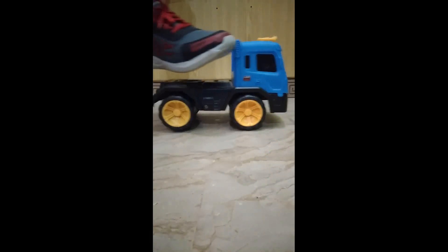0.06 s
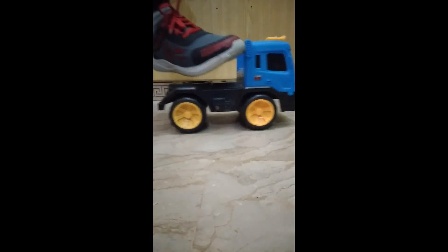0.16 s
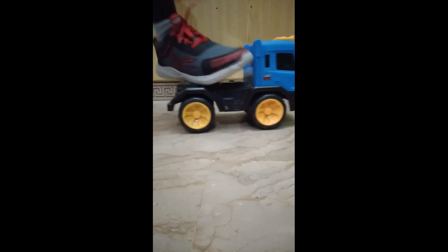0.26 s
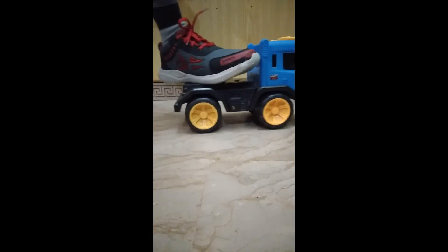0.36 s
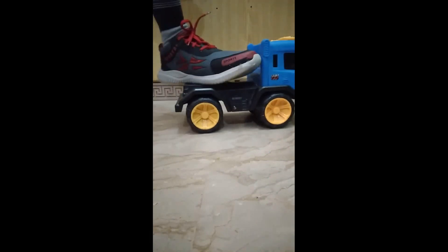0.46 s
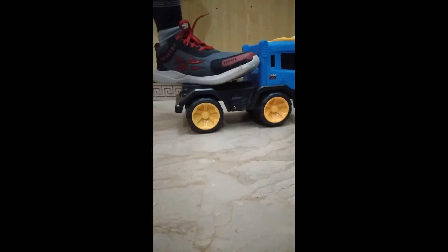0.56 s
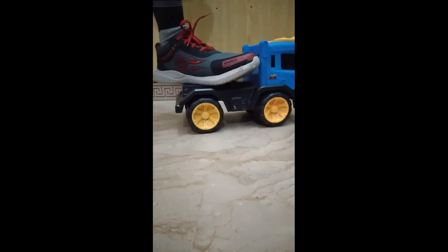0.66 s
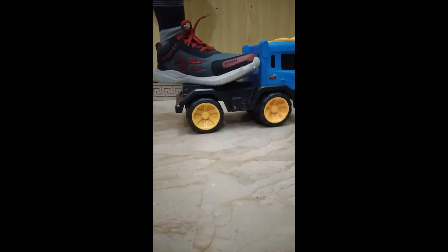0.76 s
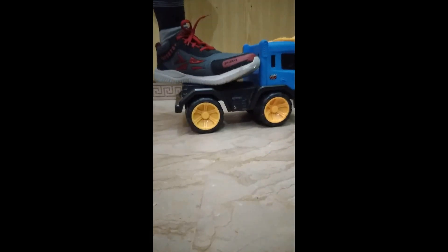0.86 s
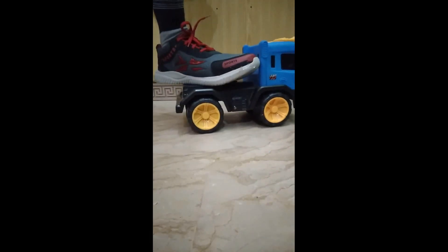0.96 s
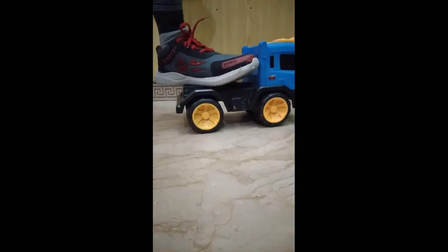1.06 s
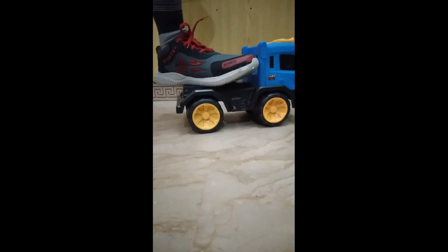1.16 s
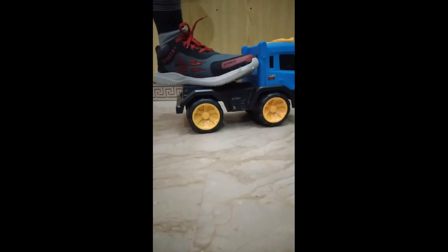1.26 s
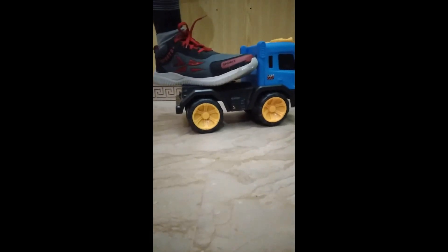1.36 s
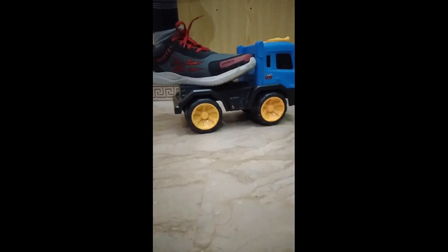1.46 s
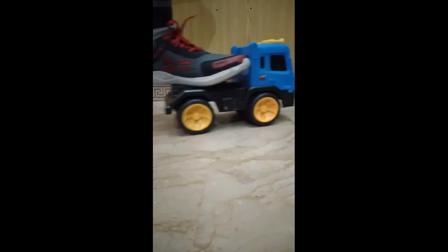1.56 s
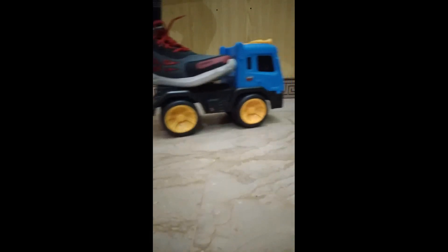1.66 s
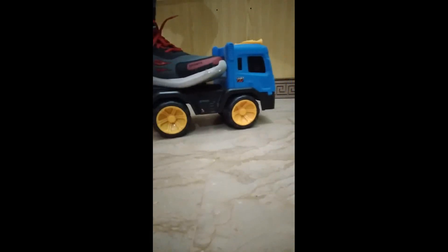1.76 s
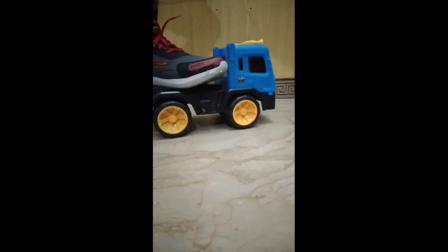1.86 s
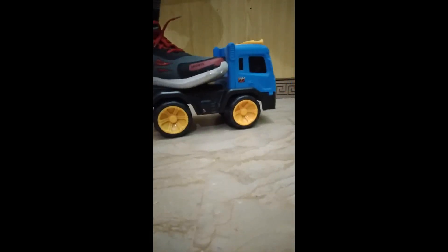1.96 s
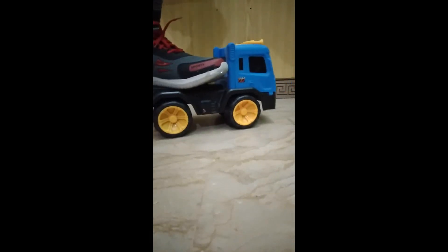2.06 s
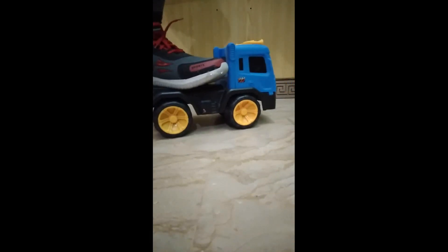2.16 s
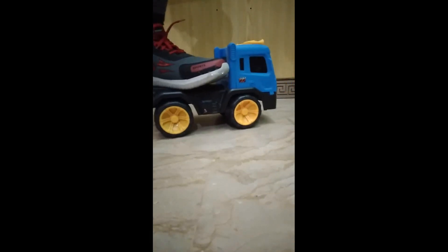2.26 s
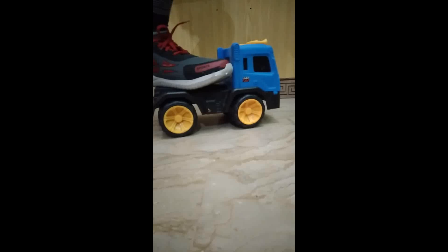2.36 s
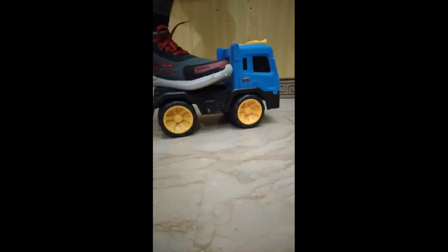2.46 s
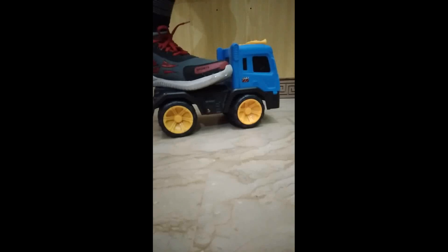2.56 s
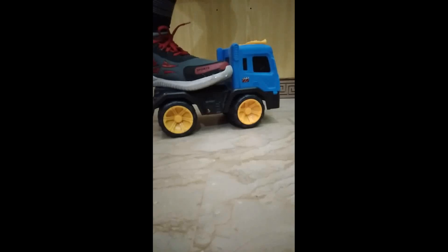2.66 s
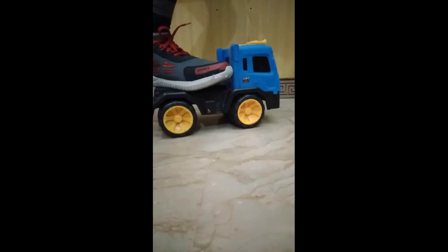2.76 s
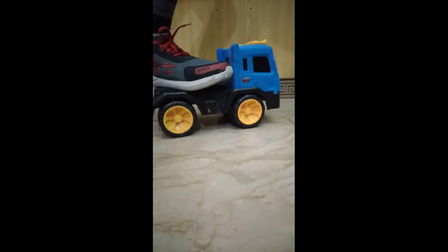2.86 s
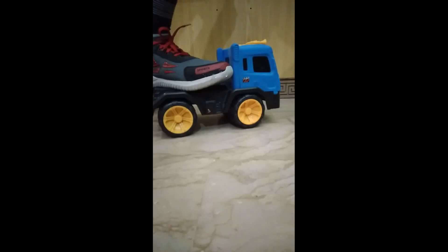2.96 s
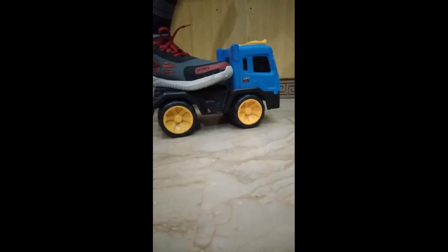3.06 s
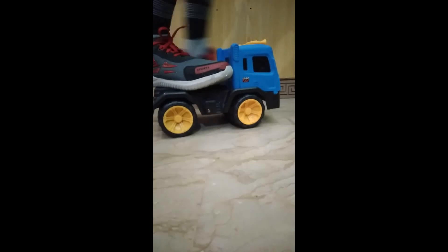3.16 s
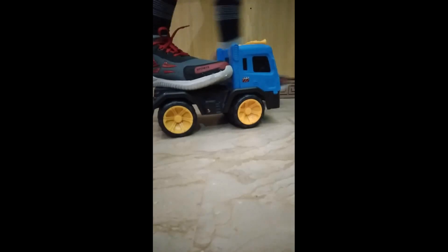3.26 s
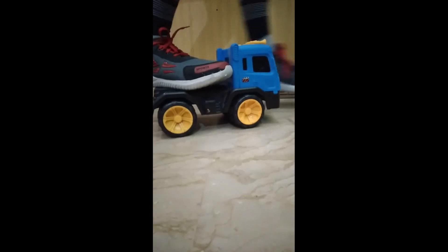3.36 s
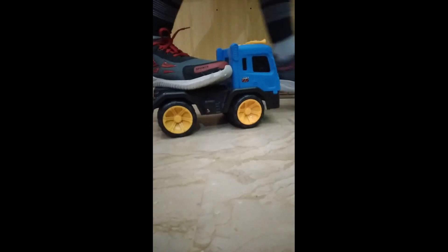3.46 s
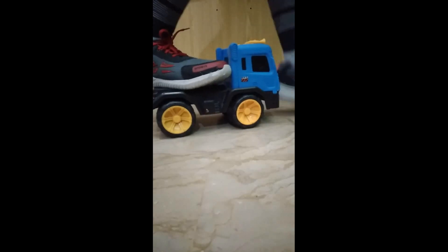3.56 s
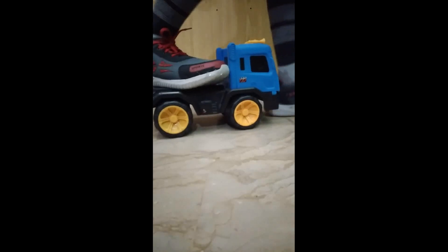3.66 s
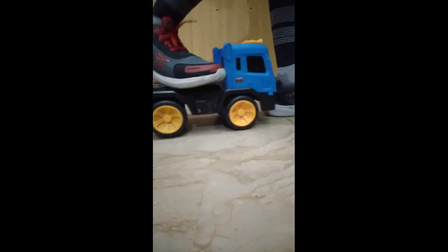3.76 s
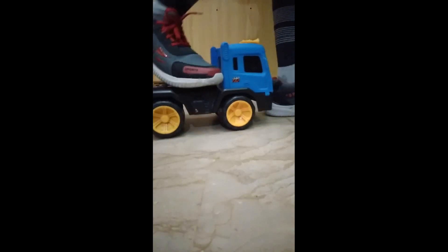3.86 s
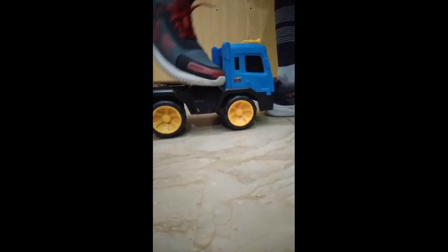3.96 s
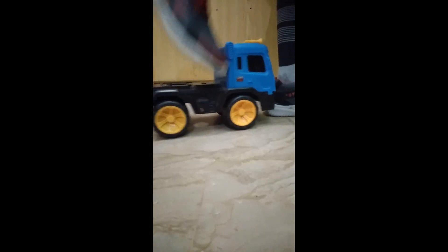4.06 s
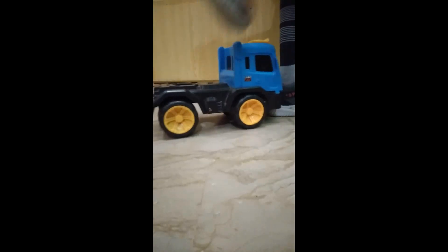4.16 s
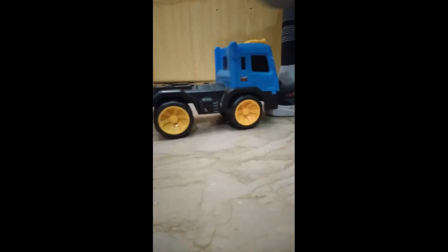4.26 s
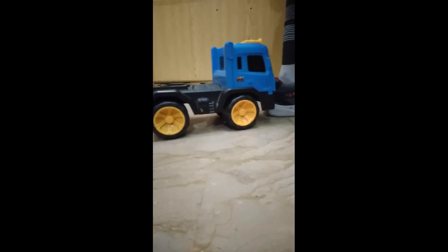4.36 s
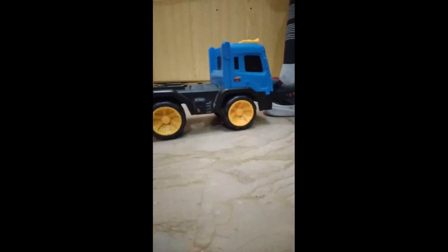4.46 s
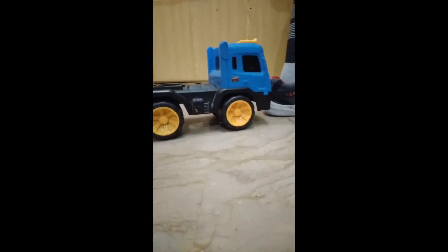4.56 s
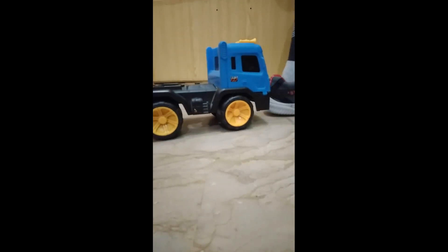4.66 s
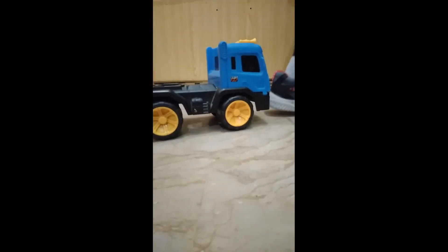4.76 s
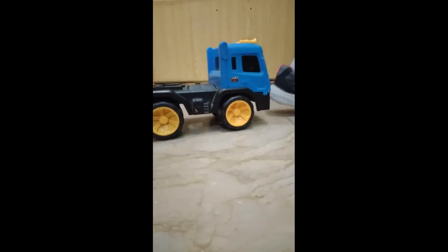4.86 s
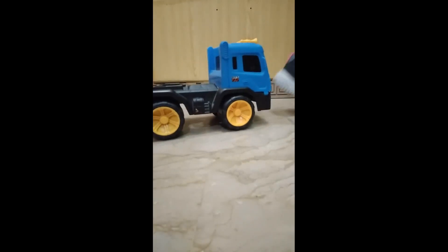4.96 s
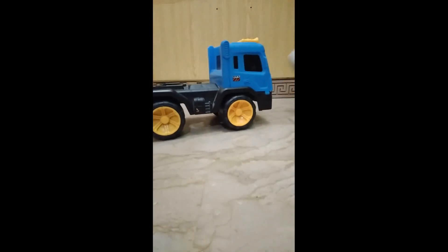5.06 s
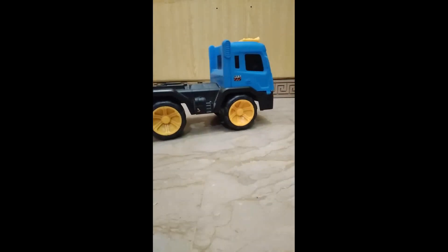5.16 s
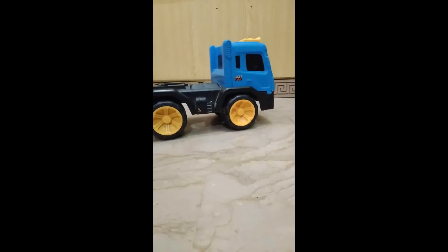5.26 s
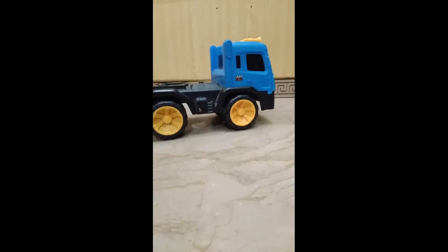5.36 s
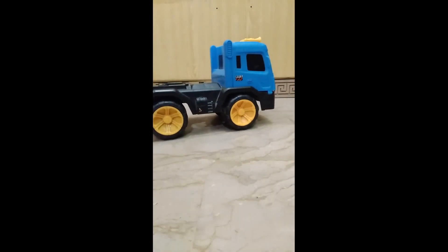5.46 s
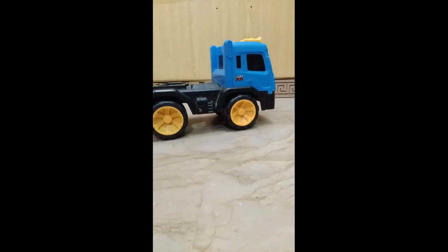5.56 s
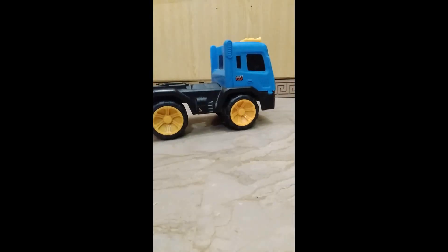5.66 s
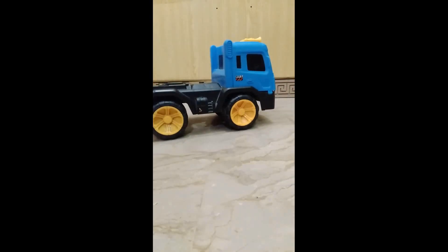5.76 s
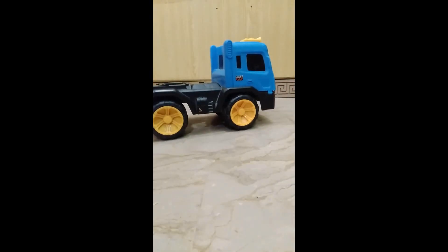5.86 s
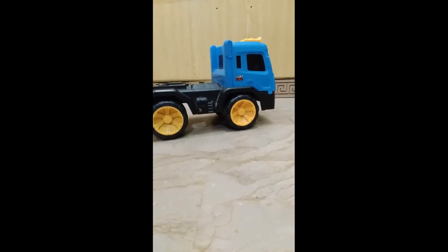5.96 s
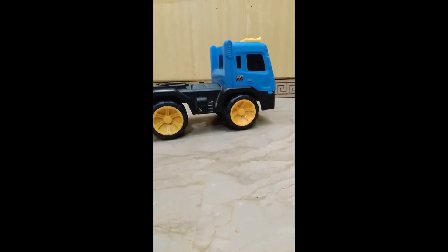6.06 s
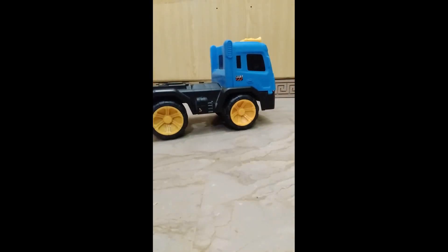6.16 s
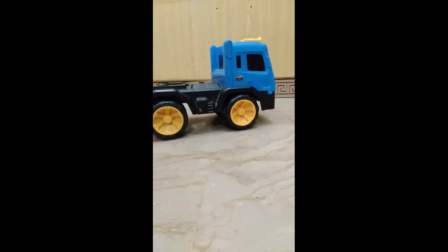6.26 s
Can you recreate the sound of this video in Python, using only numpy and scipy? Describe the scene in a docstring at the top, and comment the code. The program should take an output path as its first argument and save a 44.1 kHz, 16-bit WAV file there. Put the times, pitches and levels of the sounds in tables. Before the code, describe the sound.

A shoe lands on a hollow plastic toy truck with a loud, quick cluster of knocks and rattles. Gritty rolling fades into near quiet, then smaller knocks, ticks and dull thuds return. A second clatter comes as the foot lifts off, followed by a faint sandy scuff and quiet. Close stereo microphone in a small, hard-floored room.

```python
"""Sharp hollow knocks open the scene: a shoe steps on a plastic toy truck and shoves it to and fro on stone.
The shell is a bank of decaying modes, struck by blows and kept rattling by random bumps.
Filtered grains and noise make the grit under the wheels; short noise bursts make ticks and dull thuds.
The foot lifts off with a last clatter and a sole scuffs away as sandy noise, over a faint rumble.
Truck, grit and sole sound in a small room, picked up by two ports."""
import sys
import numpy as np
from scipy import signal
from scipy.fft import rfft, irfft, next_fast_len
from scipy.io import wavfile
from scipy.ndimage import map_coordinates

SR = 44100
rng = np.random.default_rng(int(sys.argv[2]) if len(sys.argv) > 2 else 0)


def digitize_waveform(pressure):
    """Quantize a signal to 16-bit integers and store it at the path in sys.argv[1].

    Rows of a 2-D input are taken as channels; values are limited to [-1, 1].
    """
    field = np.atleast_2d(pressure).T
    bounded = np.clip(field, -1, 1)
    quanta = np.round(bounded * 32767).astype(np.int16)
    wavfile.write(sys.argv[1], SR, quanta)


N = 278712

# Blows on the shell. Each row: start in seconds, relative level in dB,
# hardness in dB (panels over hollow body).
BLOWS = [(0.149, -19, -6), (0.158, -12, -1.5), (0.189, -19, 0.5), (0.245, -12, 9.5), (0.257, -17.5, 0),
         (0.264, -14, 7), (0.281, -26, 0.5), (0.366, -21.5, 4), (0.385, -22.5, -1), (0.396, -18, -4.5),
         (0.406, -18, -12), (0.418, -22, -1.5), (0.425, -18, 0), (0.436, -24, 0), (0.941, -56.5, -19),
         (1.485, -37.5, -26), (1.603, -21, -11), (1.714, -28.5, -1), (1.726, -24.5, -1), (1.782, -32.5, -5),
         (1.815, -31.5, -2), (1.908, -41, 6), (2.155, -50.5, -1.5), (2.451, -28.5, -5), (2.647, -32, 31),
         (2.934, -34, 11), (3.206, -44.5, -11), (3.471, -26.5, -9.5), (3.535, -35.5, 6.5), (3.591, -43, 9),
         (3.642, -21.5, -10.5), (3.675, -15.5, -5), (3.751, -32.5, 0), (3.835, -32.5, -7),
         (3.969, -32.5, 10), (4.004, -32.5, -2.5), (4.037, -34, 4), (4.141, -25.5, -3), (4.177, -30, 9.5),
         (4.189, -26.5, 5), (4.258, -23, 9.5), (4.264, -18.5, 9.5), (4.277, -18, -4), (4.839, -50, -9)]
# Modes of the hollow truck. Each row: frequency in Hz, relative level in dB,
# t60 in seconds without the sole's damping.
SHELL_MODES = [(365, -12, 0.032), (439, -1.5, 0.047), (581.4, 2.5, 0.052), (614.4, 4.5, 0.031),
               (783, 0.5, 0.016), (897, -1.5, 0.014), (1064.4, -5.5, 0.048), (1162, 1, 0.023),
               (1292, 3, 0.014), (1442, -10.5, 0.063), (1640, -23, 0.17), (1846, -8.5, 0.013),
               (2235, -20, 0.028), (2420, -17, 0.016), (2835, -17, 0.012), (3400, -20.5, 0.007),
               (3960, -15, 0.0033)]
BODY_TOP_HZ, PANEL_TOP_HZ = 820, 1760  # body modes below, then panels, then stiff edges
# Spectrum of the floor rumble. Each row: frequency in Hz, relative level in dB per Hz.
RUMBLE_SPECTRUM = [(8, 3.5), (25, -1), (45, -4.5), (65, -10.5), (100, -16.5), (200, -38.5), (500, -93)]
PUSH_RISE_S, PUSH_FALL_S = 0.08, 0.126  # time of a push to rise and fall by 60 dB


def amp(db):
    """Decibels to amplitude factor."""
    return 10 ** (np.asarray(db) / 20)


def unit(x):
    """Scale to unit RMS."""
    return x / np.sqrt(np.mean(x ** 2) + 1e-20)


def peaked(x):
    """Scale to unit peak."""
    return x / np.abs(x).max()


def along(points, hz):
    """Interpolate (Hz, value) points on a log-frequency axis."""
    f, v = np.transpose(points)
    return np.interp(np.log(hz + 1), np.log(f + 1), v)


def fade(t, t60):
    """Exponential decay by 60 dB in t60 seconds, 1 ms at least."""
    return np.exp(-np.log(1000) * t / np.maximum(t60, 1e-3))


def onset(t, attack_s):
    """Exponential rise with time constant attack_s."""
    return 1 - np.exp(-t / attack_s)


def filtered(x, response):
    """Multiply the spectrum of x by a complex response of frequency."""
    n = x.shape[-1]
    m = next_fast_len(n + 8192)
    return irfft(rfft(x, m) * response(np.fft.rfftfreq(m, 1 / SR)), m)[..., :n]


def coloured(x, spectrum):
    """Shape x by (Hz, dB) points and scale to unit RMS."""
    return unit(filtered(x, lambda hz: amp(along(spectrum, hz))))


def hump(hz, centre_hz, octaves):
    """Bell on the log-frequency axis."""
    return np.exp(-.5 * (np.log2((hz + 1) / centre_hz) / octaves) ** 2)


def add(track, s, sound):
    """Mix sound into track at s seconds, cut at the track's end."""
    start = max(round(s * SR), 0)
    part = track[..., start:start + sound.shape[-1]]
    part += sound[..., :part.shape[-1]]


def grains(rate, spread_db):
    """Random tiny impacts, rate per second, levels scattered by spread_db."""
    hits = rng.random(N) < rate / SR
    signs = rng.choice([-1, 1], N)
    sizes = amp(spread_db * np.clip(rng.standard_normal(N), -2, 2))
    return unit(hits * signs * sizes)


def wobble(rate):
    """Smooth random curve, rate knots per second."""
    knots = rng.standard_normal(int(N * rate / SR) + 4)
    return map_coordinates(knots, [np.arange(N) * rate / SR])


def resonate(x, modes):
    """Ring (Hz, dB, t60) modes with x through a unit-energy impulse response."""
    t = np.arange(SR // 8) / SR
    ring = np.zeros(len(t))
    for k, (hz, db, t60) in enumerate(modes):
        ring += (-1) ** k * amp(db) * np.sin(2 * np.pi * hz * t) * fade(t, t60)
    return signal.fftconvolve(x, ring / np.linalg.norm(ring))[:N]


def swell(start, end, rise_s, fall_s, gained_db=0):
    """Gain per sample: rise, hold sloping by gained_db from start to end, fall."""
    t = np.arange(N) / SR
    hold = amp(np.interp(t, [start, end], [-gained_db / 2, gained_db / 2]))
    return hold * fade(np.maximum(start - t, 0), rise_s) * fade(np.maximum(t - end, 0), fall_s)


def background(flutter_db=-51, air_db=-63.5):
    """Faint steady noise and a low flutter, independent at the two ports."""
    # Steady noise. Each row: frequency in Hz, relative level in dB per Hz.
    air_spectrum = [(53, -29.5), (90, -7.5), (188, -8), (271, -10), (337, -14), (658, -22), (717, -26),
                    (930, -26.5), (1670, -43.5), (4130, -47.5), (9200, -51), (10300, -49.5), (15800, -63.5)]
    low, air = rng.standard_normal((2, 2, N))
    return amp(flutter_db) * coloured(low, RUMBLE_SPECTRUM) + amp(air_db) * coloured(air, air_spectrum)


def rumble(gain_db=-3.5, side_db=-20, rise_s=0.6, fall_s=1):
    """The floor rumbles under moving weight: low noise nearly alike at both ports."""
    # Weight shifts. Each row: start in seconds, end in seconds, relative level in dB.
    weight_shifts = [(1.6, 1.904, -56), (2.571, 3.73, -44), (4.08, 4.45, -51)]
    load = sum(amp(db) * swell(start, end, rise_s, fall_s) for start, end, db in weight_shifts)
    mid, side = coloured(rng.standard_normal((2, N)), RUMBLE_SPECTRUM)
    return amp(gain_db) * load * (mid + amp(side_db) * np.array([side, -side]))


def booms(attack_s=0.014):
    """Deep bumps: decaying low sines that swing for a few cycles."""
    # Each row: start in seconds, peak in dB, frequency in Hz, t60 in seconds.
    deep_bumps = [(2.535, -36.5, 52, 0.37), (3.219, -37.5, 76, 0.26), (3.348, -32, 44.5, 0.23)]
    out, t = np.zeros(N), np.arange(SR // 2) / SR
    for s, db, hz, t60 in deep_bumps:
        swing = np.sin(2 * np.pi * hz * t) * fade(t, t60) * onset(t, attack_s)
        add(out, s, amp(db) * peaked(swing))
    return out


def scuffs(gain_db=-5, sand_db=-4, judder_db=3.5):
    """Rubber drags over dusty stone: hiss with sandy grains, its level juddering."""
    # Each row: start in seconds, end in seconds, relative level in dB, dB gained from start to end.
    drags = [(4.764, 4.795, -62.5, 8.5), (4.875, 5.129, -54.5, -1.5), (5.142, 5.274, -52.5, -7.5)]
    # Each row: frequency in Hz, relative level in dB per Hz.
    scuff_spectrum = [(240, -33), (400, -5.5), (850, -4.5), (1190, 2), (1810, -12.5), (2950, -8.5),
                      (5060, -3.5), (7320, -7), (7910, -10.5), (10400, -10.5), (13300, -17), (15800, -25)]
    drag = np.zeros(N)
    for start, end, db, gained_db in drags:
        drag += amp(db) * swell(start, end, PUSH_RISE_S, PUSH_FALL_S, gained_db)
    dust = rng.standard_normal(N) + amp(sand_db) * grains(rate=560, spread_db=9)
    dust *= amp(judder_db * wobble(50))
    return amp(gain_db) * drag * coloured(dust, scuff_spectrum)


def agitation():
    """Drive of body, panels and grit: powers of the pushes and of the rattle after each blow."""
    # Pushes that roll the wheels or drag the sole. Each row: start in seconds, end in seconds,
    # relative level of the shell in dB, panels over body in dB, relative level of the grit in dB,
    # dB gained from start to end.
    pushes = [(0.191, 0.327, -44.5, -0.5, -64, -9.5), (0.369, 0.488, -42.5, -4, -58.5, -4.5),
              (0.554, 0.664, -45.5, -1.5, -48, -1), (1.387, 1.501, -60.5, 1, -65.5, 9.5),
              (1.597, 1.709, -52.5, 0, -64, -4.5), (1.712, 1.917, -53.5, -3.5, -60, -15),
              (2.129, 2.43, -72.5, -6, -86, 6.5), (2.419, 2.53, -61, 2.5, -58, 2),
              (2.505, 2.772, -74, -10, -61.5, -4), (2.79, 2.943, -66, -2, -54.5, -7),
              (3.217, 3.235, -68, 2.5, -70, 7), (3.512, 3.533, -84, 0.5, -59.5, -2.5),
              (3.665, 3.779, -47.5, -0.5, -52, -15.5), (3.824, 3.934, -55.5, 2.5, -53.5, -13),
              (3.953, 4.119, -56, -4.5, -61, 7), (4.128, 4.305, -49, -3, -55, -9),
              (4.643, 4.689, -82, 3.5, -79.5, -4.5), (6.212, 6.29, -68, -5.5, -90, -2)]
    # loose parts chatter after a blow and shake the dust
    rattle_db, rattle_t60_s, rattle_rise_s, rattle_grit_db = -20, 0.083, 0.008, -11.5
    power, t = np.zeros((3, N)), np.arange(SR // 2) / SR
    for start, end, shell_db, panel_db, grit_db, gained_db in pushes:
        push = swell(start, end, PUSH_RISE_S, PUSH_FALL_S, gained_db)
        power += np.outer(amp([shell_db, shell_db + panel_db, grit_db]), push) ** 2
    for s, db, hard_db in BLOWS:
        rattle = amp(db + rattle_db) * fade(t, rattle_t60_s) * onset(t, rattle_rise_s)
        shares = amp([0, hard_db / 2, rattle_grit_db + hard_db / 2])
        add(power, s, np.outer(shares, rattle) ** 2)
    return np.sqrt(power)


def grinding(pressure, gain_db=-5, hiss_db=-5, hub_db=-13, judder_db=1.5):
    """Dust is ground in uneven slips: sharp grains on a fine hiss, which also ring the hubs."""
    # Each row: frequency in Hz, relative level in dB per Hz.
    grit_spectrum = [(400, -20), (900, -13.5), (1500, -11), (2000, -14.5), (2600, -5.5), (3600, -15.5),
                     (4900, -9), (6600, -12.5), (8200, -15.5), (10500, -17.5), (13200, -26), (15800, -25.5)]
    # Wheel hubs. Each row: frequency in Hz, relative level in dB, t60 in seconds.
    hub_modes = [(1616, 3.5, 0.031), (2760, -3.5, 0.011), (5800, -4.5, .008), (6600, -5, 0.029)]
    dust = grains(rate=900, spread_db=5.5) + amp(hiss_db) * rng.standard_normal(N)
    dust *= amp(judder_db * wobble(60))
    grit = coloured(dust, grit_spectrum)
    hubs = amp(hub_db) * unit(resonate(dust, hub_modes))
    return amp(gain_db) * pressure * (grit + hubs)


def ticks(pressure, t60_s=0.0053, attack_s=0.00028, octaves=0.575, gain_db=-3):
    """Joints slip and grit cracks in short noise bursts; lesser ones fall at random, scaled by pressure."""
    # Low for joints, high for crushed grit.
    # Each row: start in seconds, relative level in dB, centre frequency in Hz.
    cracks = [(0.2443, -30.5, 2868), (0.2702, -28.5, 6035), (0.3681, -33, 2697), (0.4781, -40, 6770),
              (0.5193, -38, 8110), (0.5382, -42.5, 6070), (0.7934, -53, 4880), (0.9697, -58, 6300),
              (1.2099, -66, 5070), (1.73, -43, 5500), (1.9099, -33.5, 3240), (2.1563, -47, 4970),
              (2.3264, -51.5, 3020), (2.4344, -38.5, 4400), (2.4523, -41, 6170), (2.4948, -38, 7000),
              (2.6268, -46, 5230), (2.7825, -37.5, 6070), (2.8628, -36.5, 6980), (2.8857, -34.5, 4350),
              (2.9335, -30.5, 1870), (3.5094, -40, 7246), (3.6741, -33.5, 4100), (3.8305, -40, 5086),
              (3.9692, -34.5, 4030), (4.0017, -32, 2600), (4.2551, -40.5, 5000), (4.563, -61.5, 6200),
              (4.742, -47, 4910), (4.9689, -34, 8060), (5.0311, -36.5, 5216), (5.1292, -38.5, 7030),
              (5.1888, -36.5, 7560), (5.828, -58.5, 6950), (5.9241, -61.5, 5870), (6.1399, -64.5, 5900)]
    pops_per_s, pop_hz, pop_db, pop_spread_db = 14, 6000, 11, 3.5
    out, t = np.zeros(N), np.arange(SR // 30) / SR
    chance, size = rng.random(N), rng.standard_normal(N)
    events = [(s, amp(db), hz) for s, db, hz in cracks]
    for i in np.flatnonzero(chance < pops_per_s / SR):
        events.append((i / SR, pressure[i] * amp(pop_db + pop_spread_db * size[i]), pop_hz))
    for s, gain, pitch_hz in events:
        crack = filtered(rng.standard_normal(len(t)), lambda hz: hump(hz, pitch_hz, octaves))
        crack *= fade(t, t60_s) * onset(t, attack_s)
        add(out, s, gain * amp(gain_db) * peaked(crack))
    return out


def thuds(gain_db=-7, box_db=-9, clatter_gain_db=-3, box_t60_s=0.48, clatter_t60_s=0.45):
    """Shifting weight gives soft blows: noise in a low body, a boxy middle and a clatter on top."""
    # Each row: start in seconds, relative level in dB, relative clatter level in dB, t60 in seconds.
    weight_blows = [(0.399, -40.5, 7.5, 0.21), (1.713, -42, 8.5, 0.34), (2.444, -41, -3.5, 0.148),
                    (2.645, -31, -5, 0.27), (2.699, -41, -15, 0.22), (2.789, -33.5, -3, 0.17),
                    (3.011, -36.5, -13.5, 0.26), (3.188, -41, -25, 0.78), (3.208, -31, -20, 0.21),
                    (3.342, -38.5, -24, 0.16), (3.469, -25.5, -20, 0.1), (3.645, -25.5, -9.5, 0.14),
                    (3.676, -25.5, 3.5, 0.1), (3.761, -41, -13, 0.54), (4.835, -38.5, -19, 0.11)]
    # Spectra of the three parts. Each row: frequency in Hz, relative level in dB per Hz.
    body_spectrum = [(30, -23.5), (80, -11), (140, 5.5), (220, -4), (330, 0), (500, -14.5), (900, -36.5),
                     (1800, -70)]
    box_spectrum = [(150, -25), (350, -9.5), (450, 20.5), (680, 20), (900, -18), (1800, -41)]
    clatter_spectrum = [(400, -14.5), (900, 10), (1300, 10), (2300, -9.5), (4000, -19), (9000, -43)]
    out, t = np.zeros(N), np.arange(SR // 3) / SR
    for s, db, clatter_db, t60 in weight_blows:
        low, middle, high = rng.standard_normal((3, len(t)))
        body = coloured(low, body_spectrum) * fade(t, t60)
        box = amp(box_db) * coloured(middle, box_spectrum) * fade(t, min(t60, box_t60_s))
        clatter = coloured(high, clatter_spectrum) * fade(t, min(t60, clatter_t60_s))
        clatter *= amp(clatter_db + clatter_gain_db)
        add(out, s, amp(db + gain_db) * (body + box + clatter) * onset(t, 0.0015))
    return out


def rolling(body_drive, panel_drive, body_db=-1, panel_db=-1, judder_db=3.0):
    """Bumps under the wheels, slips of the sole and loose parts keep body and panels ringing."""
    bumps = unit(grains(rate=1300, spread_db=0.5) * amp(judder_db * wobble(61)))
    body_modes = [mode for mode in SHELL_MODES if mode[0] < BODY_TOP_HZ]
    upper_modes = [mode for mode in SHELL_MODES if mode[0] >= BODY_TOP_HZ]
    body = resonate(bumps * body_drive, body_modes)
    panels = resonate(bumps * panel_drive, upper_modes)
    return amp(body_db) * body + amp(panel_db) * panels


def knocks(gain_db=1, attack_s=0.0011):
    """Each blow rings the hollow body; the harder it is, the more panels and stiff edges join in."""
    bend = 0.02  # random detuning: the load bends the shell out of tune
    sole_t60_s = 0.07  # the rubber sole damps the shell
    edge_db, edge_growth = -21.5, 1.5  # edges over body, and their dB per dB of hardness
    out, t = np.zeros(N), np.arange(SR // 10) / SR
    hz, mode_db, t60 = np.transpose(SHELL_MODES)
    part = np.digitize(hz, [BODY_TOP_HZ, PANEL_TOP_HZ])
    for s, db, hard_db in BLOWS:
        strength, detune, phase = rng.standard_normal((3, len(hz)))
        bent_hz = hz * (1 + bend * detune)
        modes = np.sin(2 * np.pi * np.outer(bent_hz, t) + np.pi * phase[:, None])
        modes *= amp(mode_db + 2 * strength)[:, None]
        modes *= fade(t, t60[:, None]) * onset(t, attack_s) * fade(t, sole_t60_s)
        shares = amp([0, hard_db, edge_db + edge_growth * hard_db])
        ring = sum(share * unit(modes[part == k].sum(axis=0)) for k, share in enumerate(shares))
        add(out, s, amp(db + gain_db) * peaked(ring))
    return out


def room_response(near_db):
    """Two-port noise tail decaying per frequency, plus early treble scatter from floor and walls."""
    # Each row: frequency in Hz, t60 in seconds.
    room_decay = [(100, 0.48), (500, 0.16), (2000, 0.26), (12000, 0.12)]
    wet_db, near_t60_s = -10.5, 0.014  # tail level against the direct sound; scatter decay
    hz, t, z = signal.stft(rng.standard_normal((2, SR // 4)), SR, nperseg=256)
    # long waves reach both ports more alike
    apart = np.clip(np.sqrt(hz / 1300), 0, 1)[:, None] * np.pi / 4
    z = np.array([np.cos(apart) * z[0] + side * np.sin(apart) * z[1] for side in (1, -1)])
    z = z * fade(t, along(room_decay, hz)[:, None]) * onset(t, 0.0016)
    tail = signal.istft(z, SR, nperseg=256)[1]
    tail *= amp(wet_db) / np.linalg.norm(tail[0])
    near_t = np.arange(SR // 50) / SR
    near = rng.standard_normal((2, len(near_t))) * fade(near_t, near_t60_s)
    near = signal.sosfilt(signal.butter(2, 2500, "high", fs=SR, output="sos"), near)
    add(tail, 0, amp(near_db) * near / np.linalg.norm(near[0]))
    return tail


def room(x, near_db):
    """Direct sound, late at the left port, plus echoes through a response redrawn every 1/8 s."""
    # Each row: frequency in Hz, lag of the left port in radians.
    port_lag = [(60, .08), (300, .15), (600, .4), (930, .6), (1200, 2.2), (1900, 3.0), (2800, 4.05),
                (3800, 6.1), (5000, 6.2), (16000, 6.25)]
    direct = filtered(x, lambda hz: np.exp(np.outer([-.5j, .5j], along(port_lag, hz))))
    echo = np.zeros((2, N))
    hop = SR // 8
    blend = np.sin(np.pi * np.arange(2 * hop) / (2 * hop))  # overlapping windows of constant power
    for start in range(0, N, hop):
        tail = room_response(near_db)
        piece = x[start:start + 2 * hop]
        piece = piece * blend[:len(piece)]
        add(echo, start / SR, signal.fftconvolve(piece[None], tail, axes=1))
    return direct + echo


def scene():
    """Truck, grit and footwork share one room; booms and rumble are added without it."""
    body_drive, panel_drive, pressure = agitation()
    crackle = room(grinding(pressure) + ticks(pressure) + scuffs(), near_db=4)
    truck = room(knocks() + rolling(body_drive, panel_drive) + thuds(), near_db=5.5)
    return rumble() + booms() + crackle + truck


def record(dry):
    """Each port has its own colour and steady noise; nothing is kept above the band limit."""
    # Responses of the two microphone ports. Each row: frequency in Hz, gain in dB.
    left_port = [(200, 5.5), (500, 4.5), (800, 3.5), (1120, 7.5), (1450, 5.5), (2100, 11), (2800, 8.5),
                 (3700, 0.5), (5000, -3.5), (7000, 8), (8300, -1), (10200, -11), (12500, -13),
                 (15000, -3.5)]
    right_port = [(200, 6), (500, 1.5), (800, -1), (1120, -9), (1450, -1.5), (2100, 8.5), (2800, 5),
                  (3700, 6), (5000, 1), (7000, 0.5), (8300, 2.5), (10200, 8), (12500, -0.5), (15000, -5)]
    top_hz = 15850
    ports = filtered(dry, lambda hz: amp([along(left_port, hz), along(right_port, hz)]))
    return filtered(ports + background(), lambda hz: hz < top_hz)


dry = scene()
out = record(dry)
digitize_waveform(out)
```